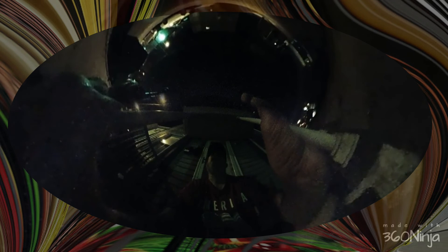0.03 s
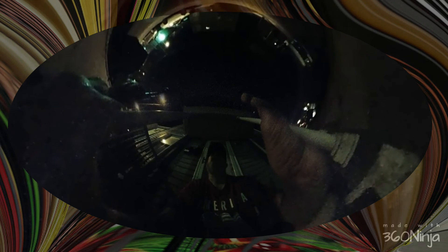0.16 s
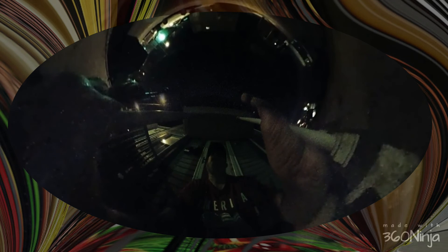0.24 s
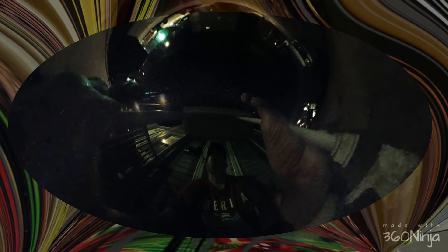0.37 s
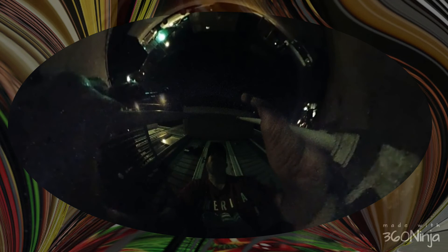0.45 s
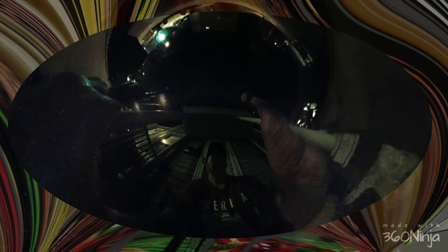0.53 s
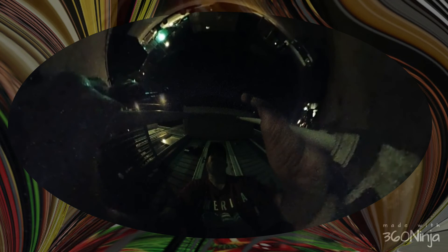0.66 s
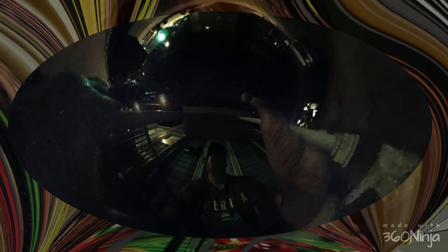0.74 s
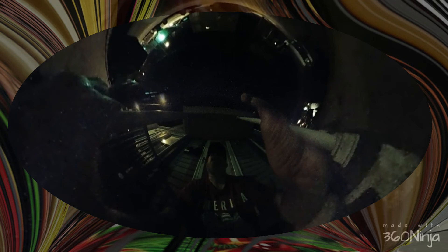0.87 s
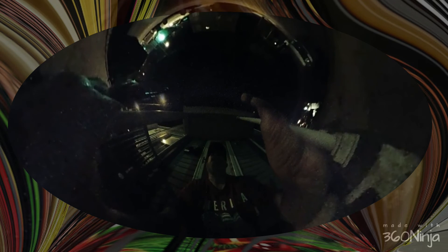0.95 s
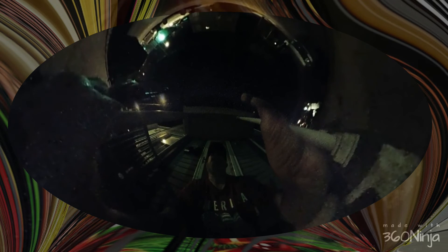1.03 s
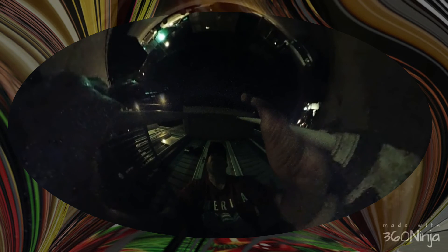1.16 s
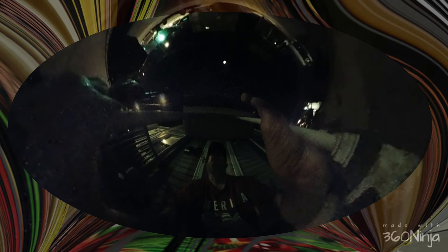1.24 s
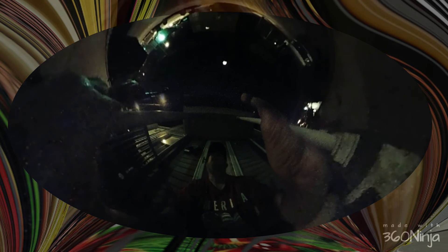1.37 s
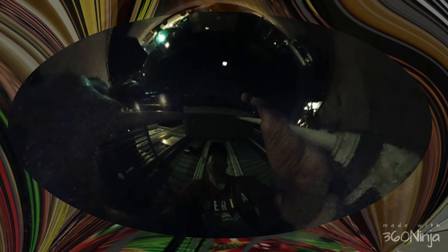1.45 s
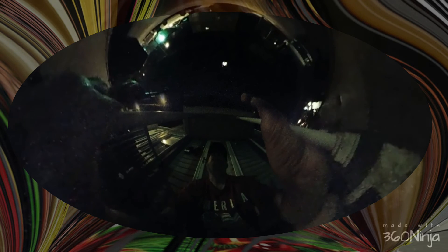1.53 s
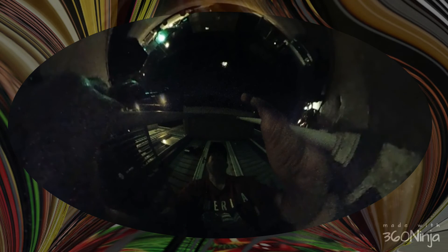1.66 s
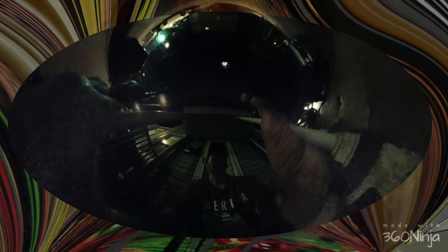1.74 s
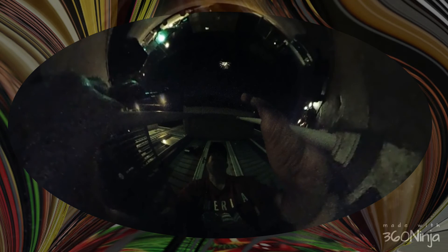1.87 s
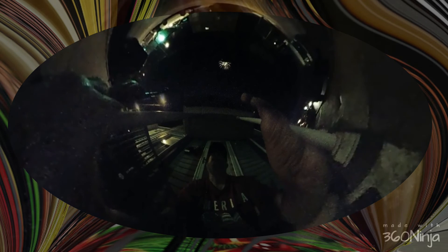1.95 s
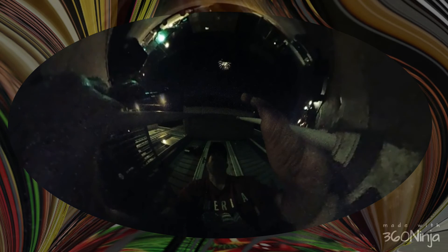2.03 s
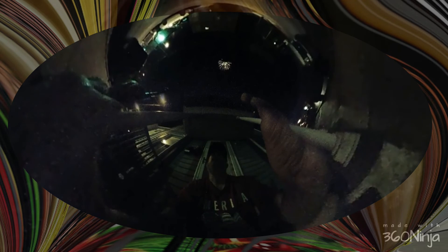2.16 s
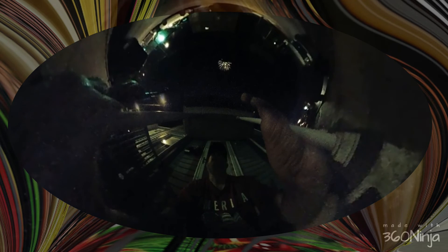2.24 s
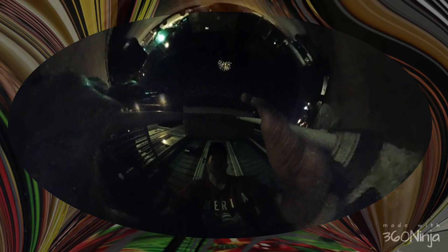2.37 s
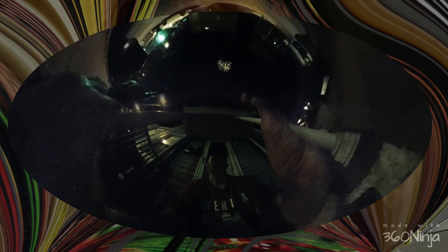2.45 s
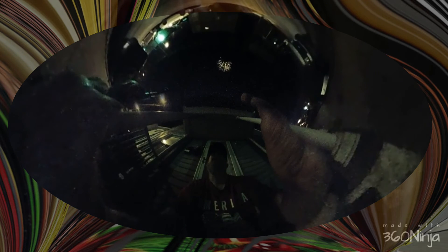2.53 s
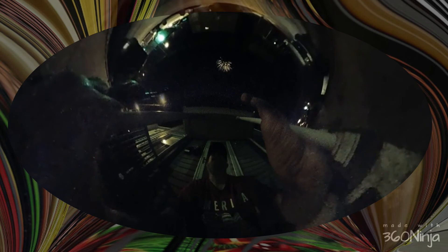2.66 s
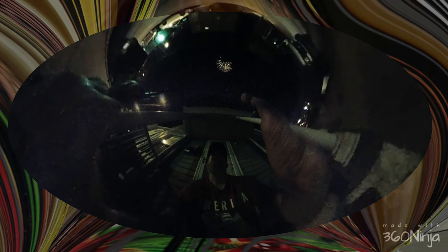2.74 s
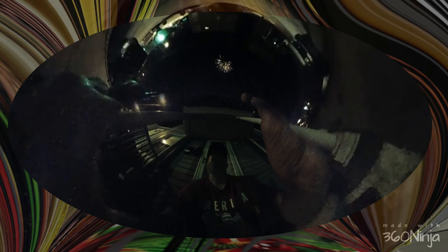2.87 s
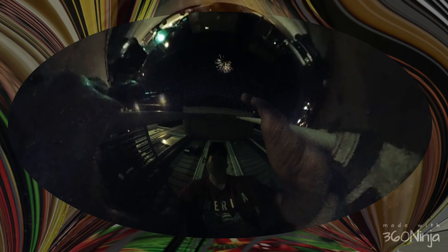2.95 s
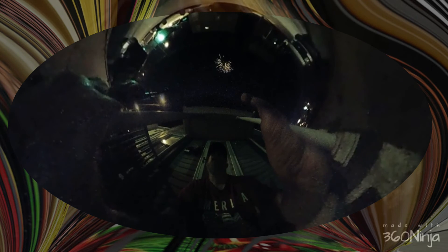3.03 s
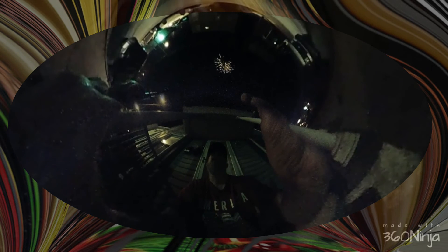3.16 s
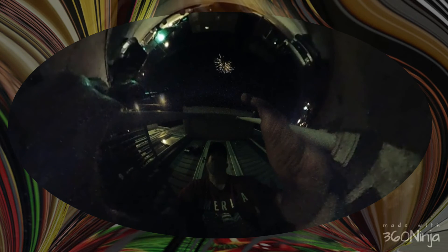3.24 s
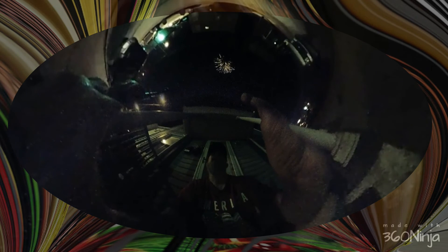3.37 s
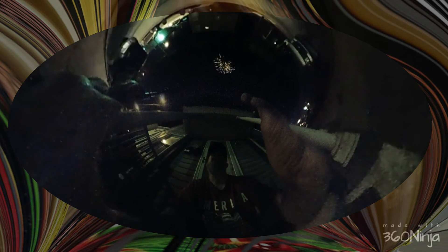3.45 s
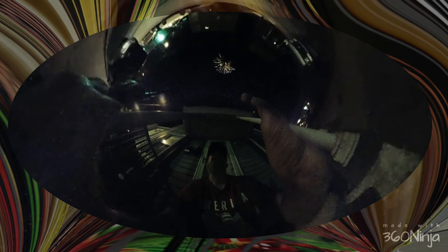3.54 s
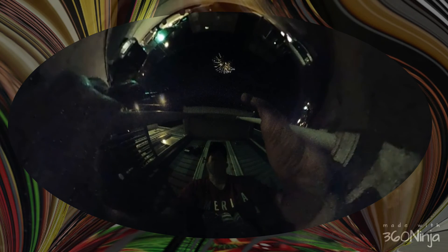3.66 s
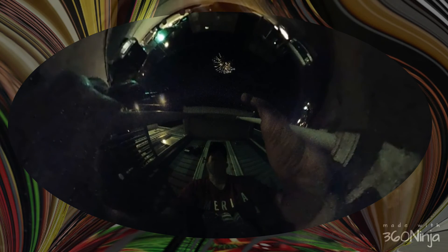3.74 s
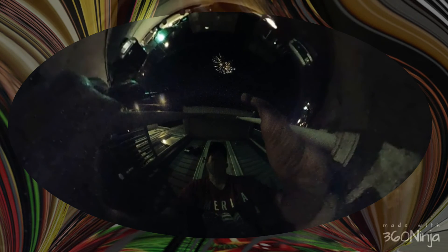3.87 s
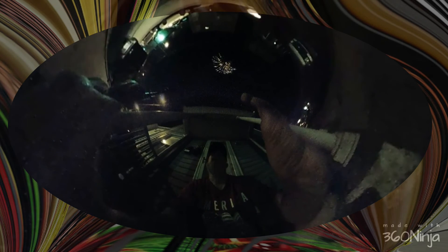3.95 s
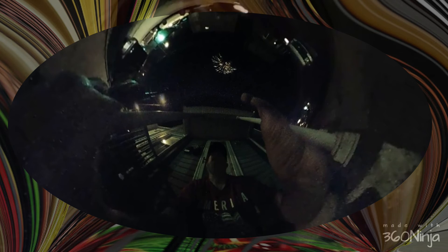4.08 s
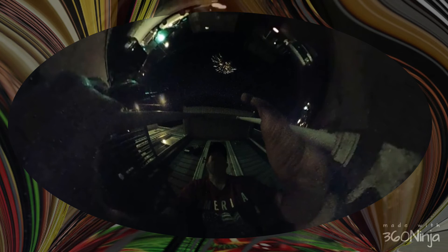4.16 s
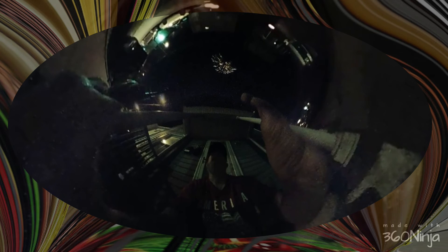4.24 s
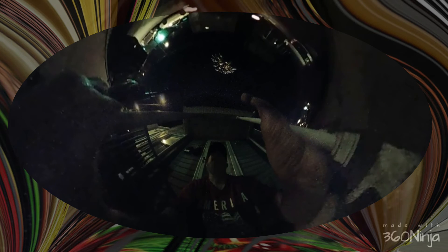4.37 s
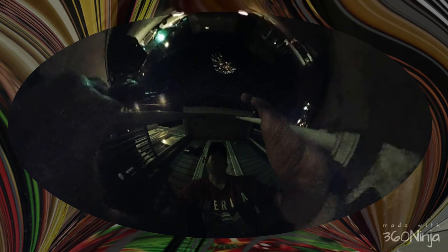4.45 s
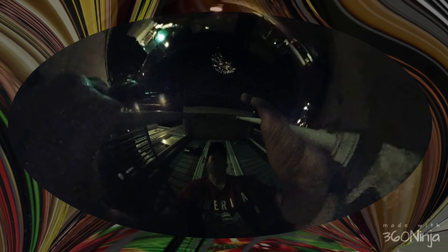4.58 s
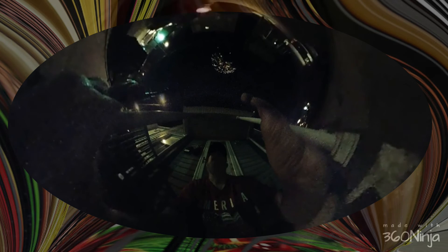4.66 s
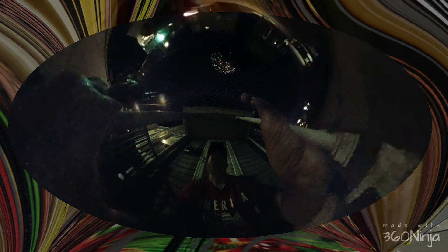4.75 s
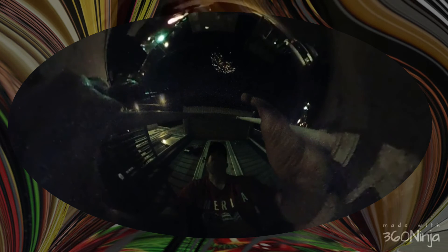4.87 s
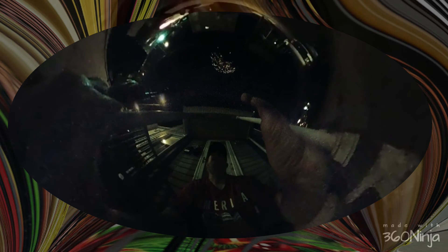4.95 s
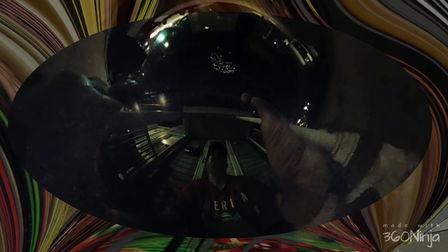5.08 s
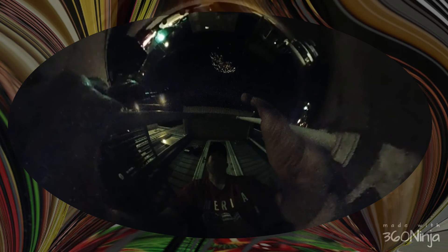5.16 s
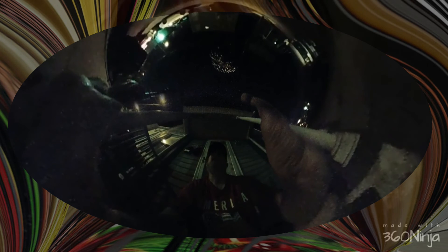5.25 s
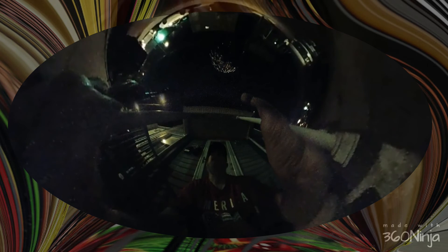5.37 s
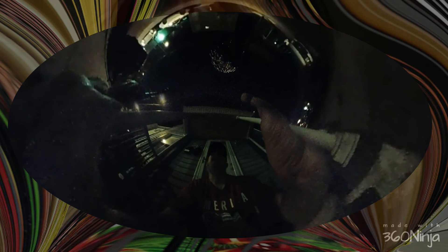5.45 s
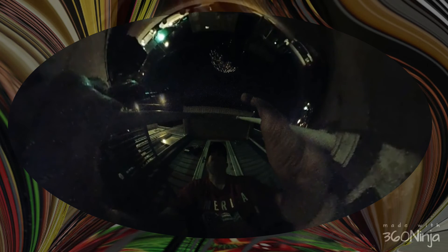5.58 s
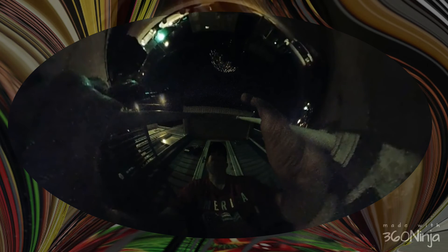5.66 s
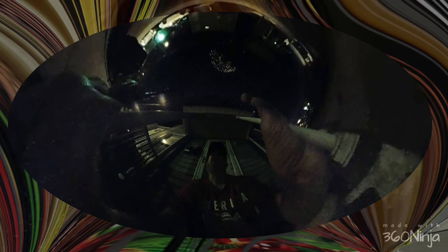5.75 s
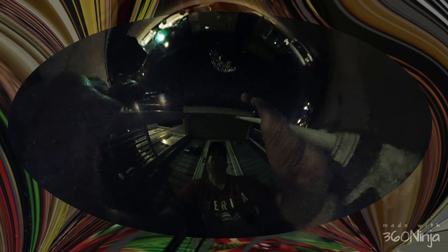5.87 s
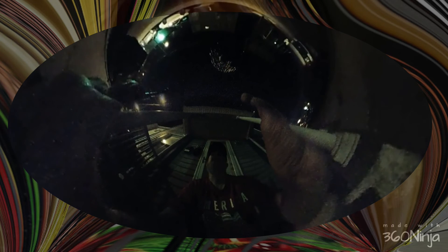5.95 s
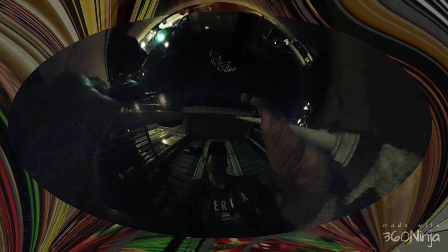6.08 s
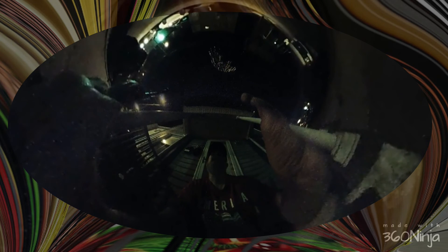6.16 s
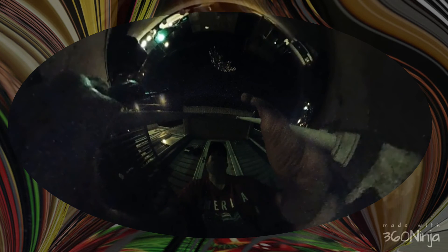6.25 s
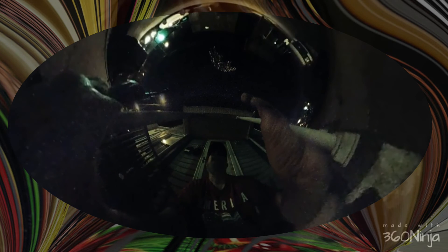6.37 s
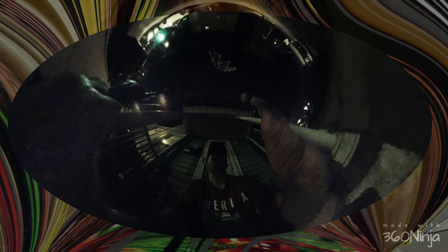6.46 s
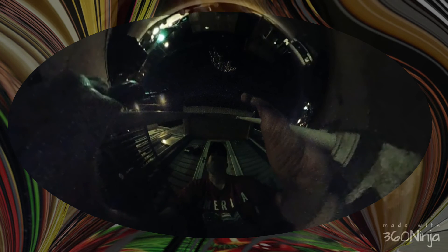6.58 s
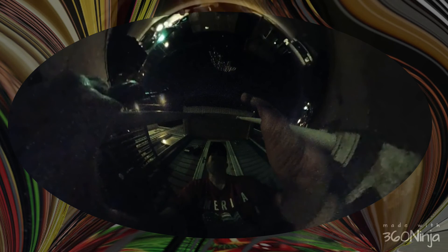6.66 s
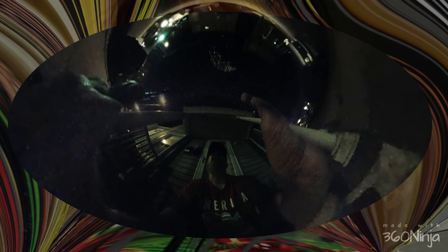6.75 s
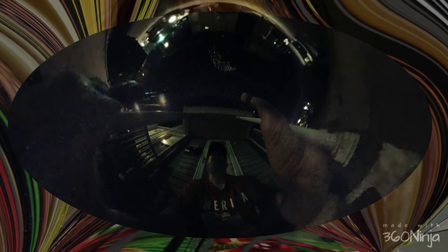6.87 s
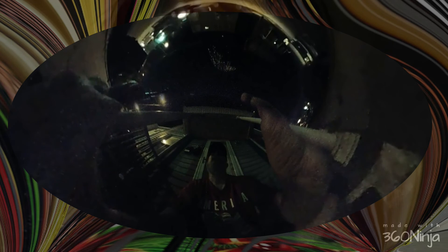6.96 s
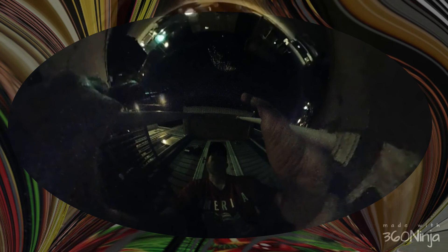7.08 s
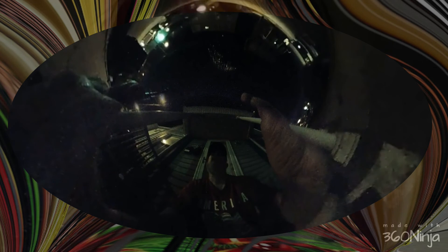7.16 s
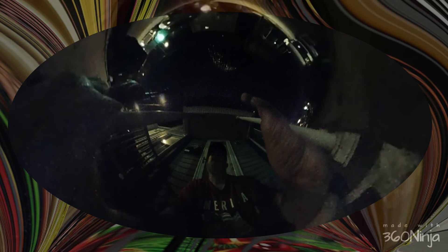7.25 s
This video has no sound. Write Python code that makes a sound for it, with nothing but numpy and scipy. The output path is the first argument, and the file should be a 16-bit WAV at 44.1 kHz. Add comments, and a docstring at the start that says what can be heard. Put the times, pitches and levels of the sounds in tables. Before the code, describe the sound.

Two fireworks burst overhead with sharp bangs and fading, rumbling echoes, while cars pass quietly on a night street.

```python
"""Fireworks over a night street

Two shells burst high up, heard from a sheltered doorstep; a fainter, farther pop leads into the second.
Each blast hits as a cluster of shock fronts, single walls slap back, and waves of echoes from the
houses die to a rumble. Three cars roll by over the far hum of the town, their engine drone, tyre roar
and hiss swelling and fading with distance. The air in the doorway rings with all of it."""
import sys
import numpy as np
from scipy import signal
from scipy.fft import rfft, irfft, next_fast_len
from scipy.io import wavfile

SR = 44100
rng = np.random.default_rng(int(sys.argv[2]) if len(sys.argv) > 2 else 0)


def to_wav(s):
    """Save 16-bit WAV."""
    ch = np.atleast_2d(s).T  # columns
    pcm = np.round(np.clip(ch, -1, 1) * 32767)  # PCM
    wavfile.write(sys.argv[1], SR, pcm.astype(np.int16))


N = 322483

# shock fronts, then the low pulsing thud after the second blast:
# t/s, peak/dB, push length/s, rounding f/Hz, left minus right/dB
BLAST_PULSES = [(1.5268, -10, 0.00038, 4000, -0.5), (1.528, -10, 0.0017, 700, 3.5),
                (1.5297, -12, 0.00024, 6000, 0), (1.532, -4.5, 0.0015, 800, 2),
                (1.5326, -18, 0.00014, 7000, -4), (1.5349, -9.5, 0.0032, 600, 3),
                (1.5434, -8.5, 0.0013, 360, 3), (1.5557, -21, 0.0011, 300, -3),
                (5.8355, -17, 0.0035, 150, 2), (5.8375, -19.5, 0.0004, 800, 0.5),
                (5.8393, -20, 0.00037, 800, -0.5), (5.841, -17.5, 0.00035, 800, 0.5),
                (5.8444, -10, 0.0047, 150, 3), (5.858, -21, 0.0045, 119, 2), (5.869, -20, 0.0045, 130, 0.5),
                (5.885, -23.5, 0.0033, 140, 5), (5.894, -25.5, 0.0028, 150, 2)]
# slapbacks off single walls: t/s, level/dB, push length/s, tail brightness/(dB per octave)
WALL_SLAPS = [(1.674, -28.5, 0.00093, 3), (1.69, -21.5, 0.0017, -6), (2.046, -36.5, 0.00056, -1),
              (2.172, -37.5, 0.0014, -3), (2.287, -37.5, 0.0011, -4), (5.763, -38, 0.0019, -17),
              (5.925, -29.5, 0.00212, -4), (5.991, -32, 0.0019, -4), (6.035, -34.5, 0.0029, -9),
              (6.073, -33, 0.0021, -14), (6.137, -40, 0.0025, -3), (6.179, -37.5, 0.0026, -3.5),
              (6.257, -33, 0.0034, -3)]
# waves of echoes: t/s, level/dB, rise/s, t60/s, boom under 400 Hz/dB, brightness above/(dB per octave)
ECHO_WAVES = [(1.527, -17, 0.0052, 0.089, -5, 2.5), (1.547, -19.5, 0.048, 0.69, 1, 1),
              (1.56, -34.5, 0.13, 2.8, -1, 3), (1.7, -47, 0.46, 10.9, 1.5, -4),
              (5.739, -46.5, 0.0025, 1.2, -6, 3), (5.745, -47.5, 0.027, 0.41, -6, 3.5),
              (5.833, -25, 0.0065, 0.21, -8, 1.5), (5.869, -36, 0.013, 0.95, 2.5, 3)]
# base tone of the echoes: f/Hz, level/dB
ECHO_EQ = [(25, -51), (58, -26.5), (85, -13), (140, -4), (200, -7.5), (280, -2.5), (420, -13), (600, -19),
           (800, -20.5), (1100, -24), (2000, -27), (2800, -31.5), (3900, -34.5), (5200, -34), (6500, -30),
           (8300, -40.5), (9300, -69.5)]
# deeper, brighter echoes for the second shell: f/Hz, gain/dB
SECOND_SHELL_EQ = [(60, 11), (110, 9), (160, -3), (210, -24), (300, -19), (420, -9), (560, 5.5), (800, 2),
                   (1400, 10), (2200, 5), (3700, 3), (7000, -5.5)]
# echo decay by pitch: f/Hz, factor on t60
ECHO_DECAY = [(60, 2.6), (140, 1.56), (290, 0.98), (1000, 1.99), (3500, 1.04), (7000, 0.54)]
# stereo width of the echoes: f/Hz, side minus mid/dB
ECHO_WIDTH = [(60, -27), (120, -10), (250, -9.5), (540, -9.5), (920, -8.5), (1600, -6), (2800, -9),
              (8000, -11)]
# pass-bys: closest t/s, level/dB, time to drive the closest distance/s, engine trim/dB, hiss trim/dB
CAR_PASSES = [(1.801, -48.5, 1.13, -7.5, -3.5), (4.02, -41, 0.82, -1.4, 0.3), (7.08, -44, 1.61, -0.5, 0)]
# engine drone, tyre roar, tyre hiss: trim/dB, fade (1 = plain spreading), peak lag/s
CAR_LAYERS = [(-2.5, 1.68, 0.075), (1, 2.4, 0.018), (-12.5, 3.38, -0.024)]
# tones of the middle car: f/Hz when closest, width/Hz, trim/dB, fade (as above), peak lag/s
CAR_TONES = [(148, 9.7, -11, 1.09, 0.14), (639, 60, -13.5, 2.5, .25), (883, 33, -9.5, 7.6, 0.079),
             (1022, 45, -8.5, 5.3, -0.15), (1467, 70, -15.5, 3.6, .05)]
# base tone of the cars: f/Hz, level/dB
CAR_EQ = [(25, -33.5), (55, -23), (150, -5), (220, -11), (310, -13), (420, -12), (600, -12), (780, -11),
          (950, -12.5), (1150, -14.5), (1500, -16.5), (2500, -25.5), (3800, -32.5), (5200, -33),
          (7300, -31.5), (8300, -40), (9200, -72)]
# the last car's own colour: f/Hz, gain/dB
LAST_CAR_EQ = [(60, 15.5), (145, -3.5), (220, -2.5), (450, 4), (950, 3), (2100, 5), (3800, 3.5), (7000, 4)]
# stereo width of cars and town: f/Hz, side minus mid/dB
TRAFFIC_WIDTH = [(60, -21.5), (100, -16.5), (180, -4), (310, -14.5), (540, -11), (920, -8.5), (1600, -7),
                 (2760, -10.5), (4770, -9.5), (8250, -14)]
# tone of the town bed: f/Hz, level/dB
TOWN_EQ = [(18, -28.5), (28, -0.5), (75, -4), (170, -9), (300, -10), (440, -13.5), (1100, -13.5),
           (1800, -14), (2500, -24), (3100, -35.5), (5000, -40.5), (6600, -32), (8200, -44.5),
           (9200, -75.5)]
# slow swell of the town bed: t/s, level/dB
TOWN_SWELL = [(0, -50.5), (1.401, -54.5), (3.499, -47.5), (4.999, -55), (7.31, -58)]
# stereo balance of echoes, car noise and town: f/Hz, left minus right/dB
BALANCE = [(60, 4), (100, -2.5), (180, 2), (310, 3.5), (540, 1), (920, 1.5), (1600, -0.5), (2760, 0),
           (4770, 0.0), (8250, 0.0)]
# air resonances of the doorway and microphone port: f/Hz, width/Hz, level/dB
DOORWAY_MODES = [(91.3, 12, -4), (135.4, 25.5, -3.5), (290.5, 43.7, 2.5), (624, 127, -8), (994, 145, -4.5),
                 (1391, 25, -3.5), (2070, 1050, -10), (6910, 1830, 0.5)]

BAND_STEP = .45   # octaves
BAND_OCTAVES = np.arange(np.log2(25), np.log2(12000), BAND_STEP)


def blasts():
    """Hits, thud and slapbacks: each pulse pushes, then sucks back longer and weaker, its edge rounded."""
    out = np.zeros((2, N))
    # filter corners in cycles per push; small walls return less bass
    blast_low_cut, slap_low_cut, slap_rounding = 0.022, 0.15, 0.32
    pulses = [(*pulse, blast_low_cut) for pulse in BLAST_PULSES]
    slaps = [(s, level_db - 1.5, push_s, slap_rounding / push_s, 4 * rng.normal(), slap_low_cut)
             for s, level_db, push_s, _ in WALL_SLAPS]
    for s, peak_db, push_s, rounding_hz, pan_db, low_cut in pulses + slaps:
        pushes = np.arange(SR // 10) / SR / push_s
        wave = butter((1 - pushes) * np.exp(-pushes), 2, [low_cut / push_s, rounding_hz], "band")
        gains = from_db(peak_db + pan_db / 2 * np.array([[1], [-1]]))
        start = round(s * SR)
        out[:, start:start + len(wave)] += wave / wave.max() * gains
    return out


def sizzle(start_s=1.531, level_db=-23, t60_s=0.068, low_hz=8860):
    """A short, bright sizzle near 9-10 kHz on the first blast."""
    age = np.arange(N) / SR - start_s
    noise = rng.standard_normal(N) + .4 * rng.standard_normal((2, N))
    bright = rms_one(butter(noise, 2, [low_hz, 1.17 * low_hz], "band"))
    return bright * (age > 0) * from_db(level_db - 60 * np.maximum(age, 0) / t60_s)


def house_echoes(second_shell_s=5.7, boom_hz=400, lumps_db=0.5):
    """Countless reflections merge into noise; each wave swells, then dies at a pace set by pitch."""
    out, step = np.zeros((2, N)), 24
    t = np.arange(0, N + step, step) / SR
    upper_lumps = drift(29)
    # each slap scatters a short, thin wave of its own
    slap_tails = [(s, level_db + 2.5, 0.0048, 0.2, -8.5, tilt) for s, level_db, _, tilt in WALL_SLAPS]
    for hz, band in noise_bands(ECHO_EQ, ECHO_WIDTH):
        power = np.zeros(len(t))
        for s, level_db, rise_s, t60_s, boom_db, tilt in ECHO_WAVES + slap_tails:
            age = np.maximum(t - s, 0)
            colour_db = boom_db if hz < boom_hz else tilt * np.log2(hz / boom_hz)
            if s > second_shell_s:
                colour_db += at_hz(SECOND_SHELL_EQ, hz)
            attack = np.minimum(age / rise_s, 1)
            decay_db = -60 * np.maximum(age - rise_s, 0) / (t60_s * at_hz(ECHO_DECAY, hz))
            power += (attack * from_db(level_db + colour_db + decay_db)) ** 2
        envelope = np.interp(np.arange(N) / SR, t, np.sqrt(power))
        lumps = upper_lumps * (hz > boom_hz) + 1.5 * drift(25)   # single walls stand out
        out += band * envelope * from_db(lumps_db * lumps)
    return out


def passing_cars(flicker_db=1.22, roar_from_hz=400, hiss_from_hz=2800):
    """Drone, roar and hiss swell as each car nears; every band flickers a little on its own."""
    t = np.arange(N) / SR
    power = np.zeros((len(CAR_LAYERS), len(CAR_PASSES), N))
    for car, (s, car_db, pass_s, engine_db, hiss_db) in enumerate(CAR_PASSES):
        trims_db = (engine_db, 0, hiss_db)
        for layer, (layer_db, fade, lag_s) in enumerate(CAR_LAYERS):
            away_db = fade * spreading_db((t - s - lag_s) / pass_s)
            power[layer, car] = from_db(car_db + layer_db + trims_db[layer] - away_db) ** 2
    roar_power = power[1]
    last_car_share = roar_power[-1] / sum(roar_power)
    layers, shared_flicker = np.zeros((3, 2, N)), drift(6.2)
    for hz, band in noise_bands(CAR_EQ, TRAFFIC_WIDTH):
        layer = int(hz > roar_from_hz) + int(hz > hiss_from_hz)
        flicker = 0.25 * shared_flicker + drift(8.1)
        layers[layer] += band * from_db(flicker_db * flicker + last_car_share * at_hz(LAST_CAR_EQ, hz))
    swells = np.sqrt(power.sum(axis=1))
    return sum(swell * rms_one(noise) for swell, noise in zip(swells, layers))


def car_tones(speed_m_per_s=16):
    """The middle car's engine hum and tyre song: wavering tones that Doppler down as it passes."""
    t, out = np.arange(N) / SR, np.zeros(N)
    s, car_db, pass_s, *_ = CAR_PASSES[1]
    along = (t - s) / pass_s
    doppler = 1 - speed_m_per_s / 343 * along / np.sqrt(1 + along ** 2)
    for hz, width_hz, trim_db, fade, lag_s in CAR_TONES:
        phase = 2 * np.pi * np.cumsum(hz * doppler) / SR
        tone = drift(width_hz) * np.cos(phase) + drift(width_hz) * np.sin(phase)
        out += tone * from_db(car_db + trim_db - fade * spreading_db(along - lag_s / pass_s))
    return out * from_db([[.6], [-.6]])   # a touch to the left


def town_hum():
    """Far traffic blurs into a smooth bed."""
    times, level_db = np.transpose(TOWN_SWELL)
    _, spectra, size = noise_spectrum(TOWN_EQ, TRAFFIC_WIDTH)
    return irfft(spectra, size)[:, :N] * from_db(np.interp(np.arange(N) / SR, times, level_db))


def doorway(x):
    """Everything heard sets the same few air resonances ringing."""
    out = x.copy()
    for hz, width_hz, level_db in DOORWAY_MODES:
        radius, angle = np.exp(-np.pi * width_hz / SR), 2 * np.pi * hz / SR
        feed = np.array([1, 0, -1]) * (1 - radius ** 2) / 2
        ring = signal.lfilter(feed, [1, -2 * radius * np.cos(angle), radius ** 2], x)
        out += from_db(level_db) * ring
    return out


def noise_bands(eq, width):
    """Yield centre f/Hz and stereo noise for overlapping bands about half an octave apart."""
    octave, spectra, size = noise_spectrum(eq, width)
    for centre in BAND_OCTAVES:
        window = np.cos(np.pi / 2 * np.clip((octave - centre) / BAND_STEP, -1, 1)) ** 2
        yield 2 ** centre, irfft(spectra * window.astype(np.float32), size)[:, :N]


def noise_spectrum(eq, width):
    """Octave axis, left and right spectra and FFT size of coloured noise near unit rms."""
    size = next_fast_len(N, True)
    hz = np.maximum(np.arange(size // 2 + 1) * SR / size, 1)
    mid, side = rfft(rng.standard_normal((2, size))) * from_db(at_hz(eq, hz))
    side = side * from_db(at_hz(width, hz))
    lean = from_db(at_hz(BALANCE, hz) / 2)
    mid_rms = np.sqrt(2 * np.sum(abs(mid) ** 2)) / size
    spectra = np.array([(mid + side) * lean, (mid - side) / lean]) / mid_rms
    return np.log2(hz), spectra.astype(np.complex64), size


def drift(rate_hz):
    """Smooth random modulation of unit rms, wandering at about rate_hz."""
    step, settle = 40, 2000
    pole = np.exp(-2 * step * np.pi * rate_hz / SR)
    noise = rng.standard_normal(N // step + settle + 2)
    slow = signal.lfilter([1], [1, -2 * pole, pole * pole], noise)[settle:]
    return np.interp(np.arange(N) / step, np.arange(len(slow)), rms_one(slow))


def spreading_db(along):
    """Distance loss for a position along the road, counted in closest distances."""
    return 10 * np.log10(1 + along ** 2)


def at_hz(curve, hz):
    """Read a curve on a log-frequency axis."""
    freqs, values = np.transpose(curve)
    return np.interp(np.log(hz), np.log(freqs), values)


def butter(x, order, hz, kind):
    """Butterworth filter."""
    return signal.sosfilt(signal.butter(order, hz, kind, fs=SR, output="sos"), x)


def from_db(db):
    """Decibels to gain."""
    return 10 ** (np.asarray(db) / 20)


def rms_one(x):
    """Scale to unit rms."""
    return x / np.sqrt(np.mean(x ** 2) + 1e-20)


def scene(shade_db=-4.5):
    """Blasts up front; the doorway shades the echoes, cars and town, which come from all round."""
    diffuse = house_echoes() + passing_cars() + car_tones() + town_hum()
    return doorway(blasts() + sizzle() + from_db(shade_db) * diffuse)


def record(dry, low_cut_hz=51, ceiling=.95, high_cut_hz=8700):
    """Drop the deepest bass, clip peaks and cut the treble above about 8.7 kHz."""
    clipped = np.clip(butter(dry, 3, low_cut_hz, "high"), -ceiling, ceiling)
    return signal.sosfilt(signal.cheby2(8, 22, high_cut_hz, fs=SR, output="sos"), clipped)


dry = scene()
out = record(dry)
to_wav(out)
```